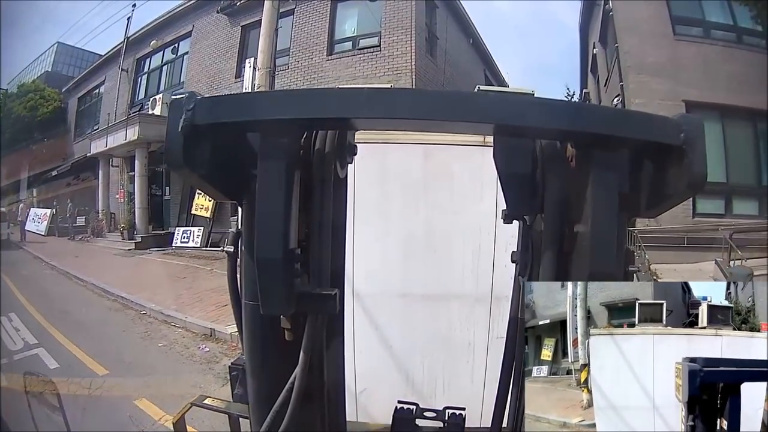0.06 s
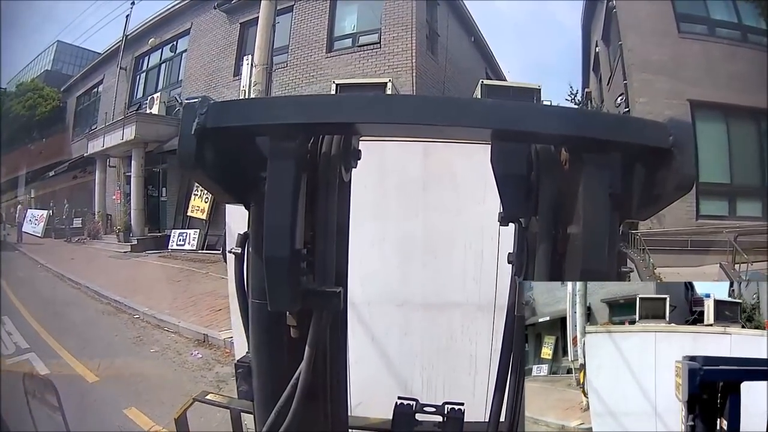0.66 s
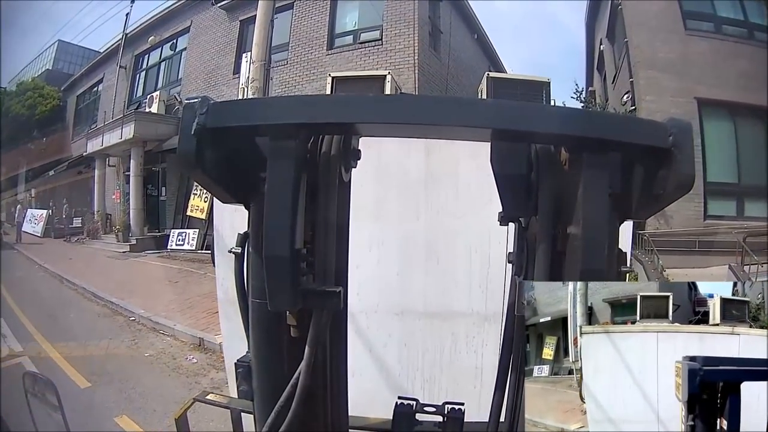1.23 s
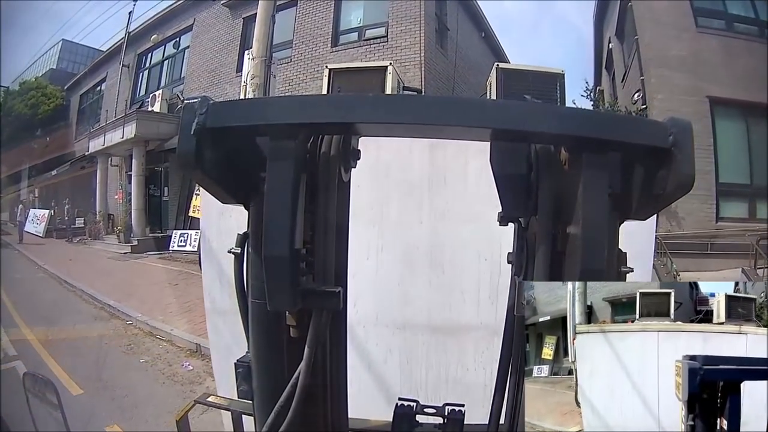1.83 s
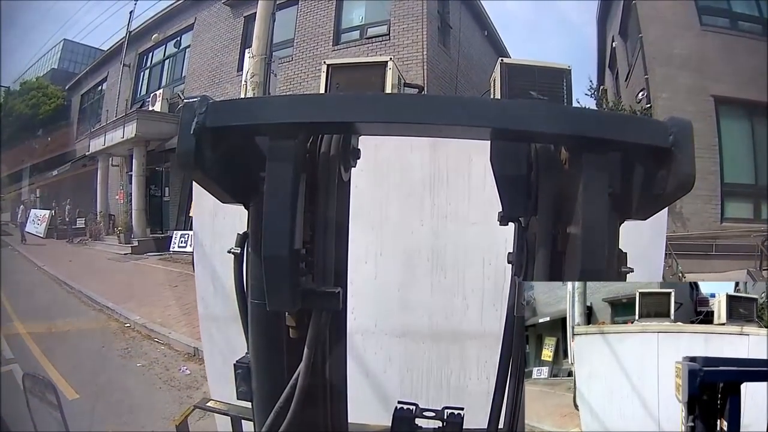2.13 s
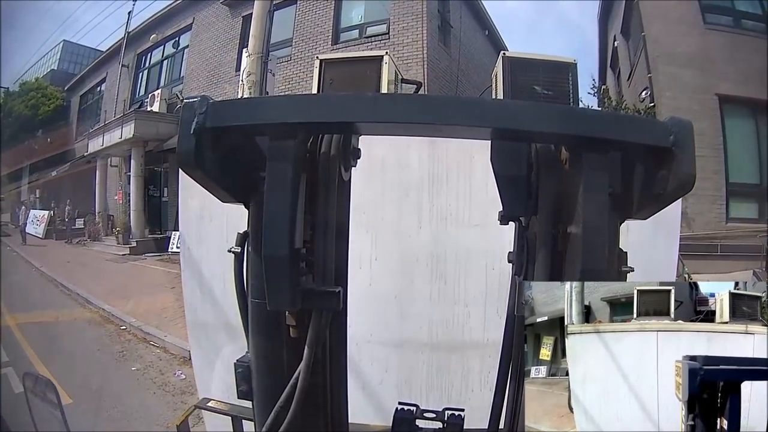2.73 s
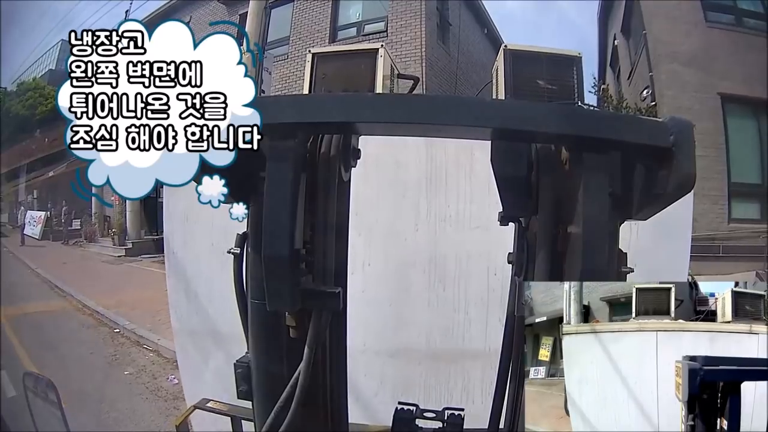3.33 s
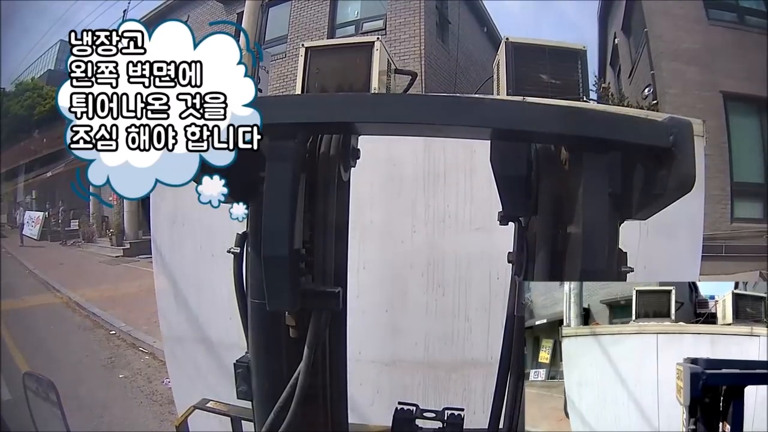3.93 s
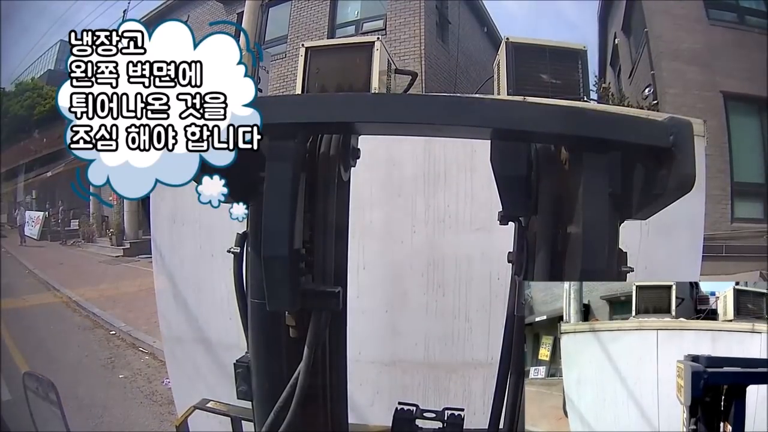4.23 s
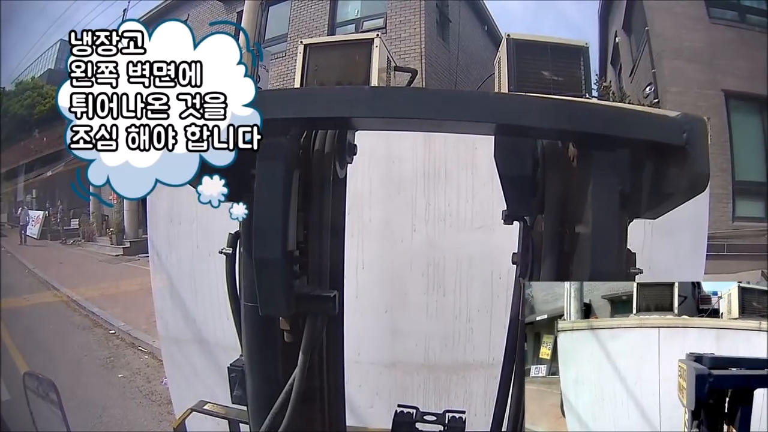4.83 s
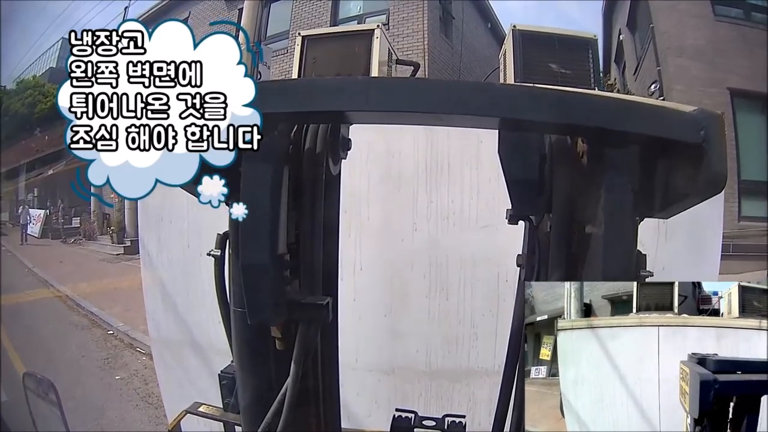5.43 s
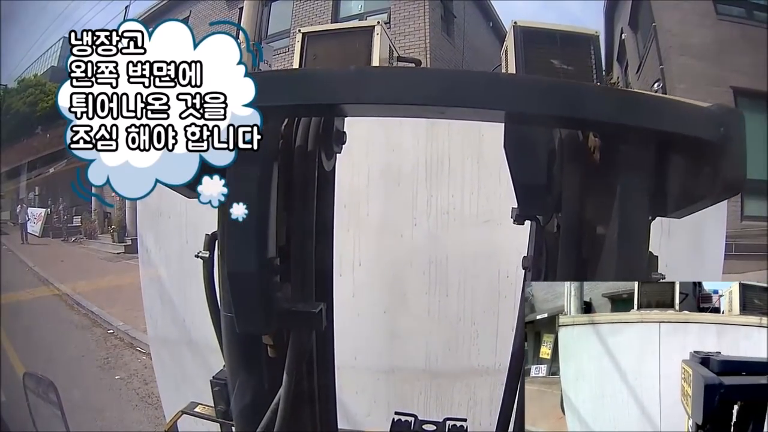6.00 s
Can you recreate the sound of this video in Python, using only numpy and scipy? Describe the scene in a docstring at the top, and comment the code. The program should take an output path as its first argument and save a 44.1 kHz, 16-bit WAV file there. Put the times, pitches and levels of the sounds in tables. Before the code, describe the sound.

A forklift drives slowly along a street, heard from the driver's seat through a small, dull microphone. Its engine surges twice with a strong hum and a gear whine, the first time amid thumping bumps and steel rattles. It settles over a low road rumble, with faint metallic whistles. Past halfway the bumps return: the mast rattles and squeaks once, the forks clang, and a sharp click leads into the last jolts.

```python
"""A forklift carries a load slowly along a street, heard from the driver's seat on a small, dull mic.
Its four-cylinder engine surges twice under a strong hum and a gear whine, the first time amid bumps
that thump the chassis and rattle the mast. It settles to a nearly even speed over the road's rumble,
and faint metallic whistles drift in. Past halfway the bumps return: the mast rattles and squeaks once,
the forks clang, and the sharpest of a few thin clicks leads into a last run of jolts."""
import sys
import numpy as np
from scipy import signal
from scipy.fft import rfft, irfft, next_fast_len
from scipy.io import wavfile
from scipy.ndimage import uniform_filter1d, map_coordinates

SR = 44100
rng = np.random.default_rng(int(sys.argv[2]) if len(sys.argv) > 2 else 0)


def wav_out(sig):
    """Save sig, one row per channel (or a flat mono array), as 16-bit PCM at SR to the path in sys.argv[1]."""
    wavfile.write(sys.argv[1], SR, np.round(np.clip(np.atleast_2d(sig).T, -1, 1) * 32767).astype(np.int16))


N = 267422

# bumps through the chassis: (time [s], level [dB], brightness [dB/octave])
ROAD_BUMPS = [(0.247, -8, 3), (.28, -9.5, 4), (.308, -5.5, 4), (.367, -6.5, 3), (.398, -7.5, 2.5),
              (0.44, -7.5, 3), (.517, -7.5, 5.5), (.678, -11.5, 4), (.762, -5.5, 2.5), (0.785, -5.5, 3),
              (2.282, -16, -18), (3.561, -11, -2), (3.993, -9, 1.5), (4.387, -12.5, 13), (5.274, -6, -5.5),
              (5.47, -11.5, 2.5), (5.489, -4, -0.5), (5.677, -8, 1)]
# tone colour of loose steel: (frequency [Hz], level [dB])
STEEL_SPECTRUM = [(60, -70.5), (250, -8.5), (420, -0.5), (700, 1.5), (1200, 0), (1500, -1.5), (1900, -1.5),
                  (2700, -6.5), (3700, -5.5), (4600, -10.5), (6000, -73)]
# ringing panels: (frequency [Hz], width [Hz], boost [dB])
PANEL_MODES = [(1243, 36, 3.5), (1337, 80, 5), (1630, 47, 2), (1826, 21, 6), (1997, 130, 4), (2220, 56, 2),
               (2620, 56, 1.5), (2866, 26, 7), (3160, 240, -0.5)]


def hum(speed, shaft, load_db):
    """The engine's hum grows with load and peaks where its pitch meets the cab's resonance."""
    # the hum dips briefly: (time [s], depth [dB], half width [s])
    dips = [(.02, 9.5, 0.061), (0.62, 11.5, 0.12), (1.05, 4.5, .12), (2.68, 9.5, 0.096), (3.9, 11, 0.026),
            (4.14, 14.5, 0.024), (4.6, 16, 0.036), (5.47, 10, 0.088), (5.809, 15.5, 0.06)]
    order = 5  # cycles per shaft turn
    t = np.arange(N) / SR
    dip_db = sum(db * np.exp(-((t - s) / width) ** 2) for s, db, width in dips)
    cab = resonance(order * speed, centre=160.2, width=15.3)
    waver_db = 1.1 * wobble(9) + 0.84 * wobble(30)
    level_db = -13.4 + 0.75 * load_db - dip_db + waver_db
    return amp(level_db) * cab * tone(order * shaft + 0.0051 * wobble(27))


def engine(shaft, load_db):
    """Low shaft tones, with block noise and panel clatter pulsed by the firings; all grow with load."""
    # engine tones: (order [x shaft rate], relative level [dB])
    orders = [(1, -21), (2, -6), (3, -11), (4, -15), (4.5, -11), (5.5, -12), (6, -7), (7, -9.5),
              (7.5, -11.5), (8, -9.5), (10, -9.5), (10.5, -13), (11, -9.5), (12, -10), (12.5, -14.5),
              (14, -15.5), (15, -9.5), (16, -16.5)]
    # dark noise of the block: (frequency [Hz], level [dB])
    block_spectrum = [(80, -26), (170, 1), (240, 5), (295, -1), (345, 0), (430, -3.5), (520, -4),
                      (620, -8.5), (800, -19.5), (1400, -41)]
    # brighter clatter: (frequency [Hz], level [dB])
    clatter_spectrum = [(300, -24), (700, 0.5), (1000, -0.5), (1250, -4.5), (1500, -7), (1950, -8),
                        (2500, -11.5), (3050, -14), (3600, -15), (4500, -23)]
    drone = amp(-27 + load_db) * shaft_tones(orders, shaft, flutter_db=2.5, drift=0.07, rate=9)
    block = amp(-24.5 + load_db) * patchy(noise(block_spectrum), depth_db=-0.5)
    block *= firings(shaft, scatter_db=2, sharpness=0.18)
    clatter = patchy(noise(clatter_spectrum, peaks=PANEL_MODES), depth_db=2.5)
    clatter *= firings(shaft, scatter_db=0.5, sharpness=0.097)
    return drone + block + amp(-28.5 + 0.94 * load_db) * clatter


def chassis():
    """The wheels rumble, and each bump rings the frame's low modes in a fresh balance."""
    # roughness of the road: (time [s], relative level [dB])
    roughness = [(0.0, -20.5), (0.15, -21.5), (0.4, -20), (.6, -25), (1.2, -29.5), (2.0, -28), (2.36, -27),
                 (2.6, -31.5), (3.3, -29.5), (3.6, -22.5), (3.95, -28), (4.94, -26.5), (5.18, -23.5),
                 (5.3, -18.5), (5.52, -22.5), (6.06, -25.5)]
    # wheel rumble: (frequency [Hz], level [dB])
    rumble_spectrum = [(8, -54), (22, -33), (38, -22), (56, -3.5), (80, -1.5), (108, -6.5), (130, -1),
                       (175, -1), (215, -12), (320, -26), (800, -65)]
    # modes of the frame on its tyres: (frequency [Hz], level [dB], decay time [x base_t60_s])
    frame_modes = [(53, -14.5, 1.9), (64.7, -11, 0.52), (99, -4.5, 0.37), (124.7, 0, 1.3), (145.1, -3, 1.6),
                   (193.7, -4.5, 0.76), (259, -17.5, 0.48), (363, -16.5, 0.53), (446.3, -18, 0.41)]
    base_t60_s = 0.18
    road_db, = curves(roughness)
    rumble = amp(road_db + 2.5) * noise(rumble_spectrum)
    t = np.arange(SR // 2) / SR
    soft_tyre = 1 - np.exp(-t / 0.0028)
    thumps = np.zeros(N + len(t))
    hz, mode_db, decay = np.transpose(frame_modes)[:, :, None]
    for s, db, tilt in ROAD_BUMPS:
        strength = amp(mode_db + tilt * np.log2(hz) + 2 * rng.standard_normal(hz.shape))
        pitch = hz * (1 + 0.015 * rng.standard_normal(hz.shape))
        ring = strength * tone(pitch * t) * np.exp(-np.log(1000) * t / (base_t60_s * decay))
        thump = soft_tyre * ring.sum(axis=0) / np.linalg.norm(strength)
        thumps[round(s * SR):][:len(t)] += amp(db) * thump
    return rumble + thumps[:N]


def boom(speed, shaft):
    """An engine order swells whenever the speed brings it onto a resonance of the frame."""
    # frame resonances: (order [x shaft rate], frequency [Hz], width [Hz], level in tune [dB])
    resonances = [(3, 90, 5, -25), (4, 132, 4, -31), (5.5, 165, 7, -25), (6, 184, 8, -20.5),
                  (10, 340, 8, -31.5), (15, 516, 11, -39), (16, 478, 12, -34.5), (18, 526, 11, -30),
                  (20, 692, 14, -32)]
    return sum(amp(db + 2 * wobble(22)) * resonance(order * speed, hz, width)
               * tone(order * shaft + 0.06 * wobble(14)) for order, hz, width, db in resonances)


def gears(shaft):
    """Meshing teeth whine: a tone with sidebands, heard through the housing's resonance."""
    # swell of the whine: (time [s], gain [dB])
    swell = [(0, -31), (.24, -27.5), (.34, -34), (.62, -32), (.72, -31.5), (.98, -31), (1.1, -35),
             (2.45, -33), (2.53, -28), (2.92, -26.5), (3.05, -29), (3.85, -29), (3.93, -24.5), (4.55, -26),
             (4.7, -24), (5.25, -24), (5.3, -29.5), (5.85, -32.5), (6.06, -27)]
    # mesh tone and sidebands: (order [x shaft rate], relative level [dB])
    mesh_orders = [(18.5, -9.5), (19, -12), (19.5, -4), (20, -10), (20.5, -5.5), (21, -10)]
    whine_db, = curves(swell)
    mesh = shaft_tones(mesh_orders, shaft, flutter_db=2, drift=0.11, rate=13)
    return filtered(amp(whine_db) * mesh, lambda hz: resonance(hz, centre=590.6, width=70))


def mast_rattle():
    """Loose steel knocks in short bursts that ring the mast's channels."""
    # loud rattles: (time [s], level [dB], t60 [s], brightness [dB/octave])
    hits = [(.04, -25.5, 0.028, -4.5), (0.141, -28, 0.46, -1), (.176, -22.5, 0.41, -2),
            (.245, -21, 0.12, -5), (0.339, -24.5, .08, -2), (.357, -21.5, 0.082, -4),
            (.47, -23, 0.15, -5.5), (0.75, -25.5, 0.14, -1), (.775, -22, 0.089, -8),
            (3.421, -22, 0.018, -7), (3.646, -25, 0.22, 0.5), (3.715, -23, .12, -1.5),
            (3.765, -22.5, .14, -5), (3.958, -20.5, 0.12, -5), (3.977, -16, 0.233, -7.5),
            (4.24, -20, 0.11, 8), (4.263, -16, 0.097, 4), (4.281, -13, 0.08, -10), (4.328, -20, .17, -0.5),
            (4.363, -19.5, .09, 7), (4.384, -15.5, 0.065, -0.5), (5.219, -20, 0.22, -10),
            (5.466, -22.5, .1, -5.5), (5.635, -17, 0.083, -3.5), (5.648, -17.5, 0.094, -5.5),
            (5.658, -15, 0.067, -12)]
    # ring of the channels: (frequency [Hz], width [Hz], boost [dB])
    modes = [(460, 23, 5.5), (645, 21, 5.5), (940, 33, 7.5), (1390, 84, 5.5), (1750, 50, 4.5),
             (1980, 87, 6), (2580, 76, 3)]
    return sum(amp(db) * blow(s, t60, attack=0.00013) * noise(STEEL_SPECTRUM, tilt, modes)
               for s, db, t60, tilt in hits)


def mast_squeak():
    """Dry steel slips three times: a falling squeak with a rasp under it."""
    # path of the squeak: (time [s], pitch [Hz], level [dB])
    path = [(4.221, 2190, -45), (4.226, 2260, -14), (4.231, 2300, -10.5), (4.238, 2230, -13.5),
            (4.242, 2120, -25), (4.246, 2010, -16), (4.249, 1900, -25), (4.252, 1830, -18),
            (4.259, 1790, -38)]
    # rasp of slipping steel: (frequency [Hz], level [dB])
    rasp_spectrum = [(2400, -29), (3200, -0.5), (3800, 0), (4600, -14.5)]
    hz, db = curves(path)
    t = np.arange(N) / SR
    slipping = (t > path[0][0]) & (t < path[-1][0])
    squeak = amp(db + 0.97 * wobble(299.4)) * tone(np.cumsum(hz) / SR + 0.03 * wobble(460))
    rasp = amp(db - 14) * noise(rasp_spectrum)
    return slipping * (squeak + rasp)


def forks():
    """A jolted fork rings briefly on one note."""
    # dull clangs: (time [s], pitch [Hz], level [dB], t60 [s])
    clangs = [(.786, 460, -19.5, 0.21), (4.365, 421, -17, 0.27), (5.492, 289, -21.5, .16),
              (5.643, 961, -23, .13)]
    t = np.arange(N) / SR
    return sum(amp(db) * blow(s, t60, attack=0.004) * tone(hz * t + 0.04 * wobble(64))
               for s, hz, db, t60 in clangs)


def chatter(load_db):
    """Loose steel is shaken by every bump, and ticks at random, harder as the engine works."""
    ticks_per_s = 5
    draws = rng.random((round(ticks_per_s * N / SR), 2))
    ticks = sum(amp(-34 + 2 * size) * blow(when * N / SR, t60=0.1, attack=0.0005) for when, size in draws)
    ticks *= amp(load_db) * noise(STEEL_SPECTRUM, tilt=-1.1, peaks=PANEL_MODES)
    shakes = sum(amp(db - 20) * blow(s, t60=0.13, attack=0.0035) for s, db, _ in ROAD_BUMPS)
    return ticks + shakes * noise(STEEL_SPECTRUM, tilt=-9.5, peaks=PANEL_MODES)


def mast_whistles():
    """Faint, wavering metallic notes fade in and out."""
    # whistles: (start [s], end [s], pitch [Hz], level [dB])
    notes = [(2.509, 2.553, 3010, -29), (3.088, 3.658, 2810, -43), (3.555, 3.88, 1342, -38.5)]
    t = np.arange(N) / SR
    whistles = np.zeros(N)
    for start, end, hz, db in notes:
        fade = np.clip(np.minimum(t - start, end - t) / 0.033, 0, 1)
        whistles += fade * amp(db + 1.3 * wobble(24.96)) * tone(hz * t + 0.096 * wobble(62))
    return whistles


def clicks():
    """Tiny sharp clicks, each trailed by a faint crackle."""
    # thin clicks: (time [s], peak level [dB])
    snaps = [(.243, -42), (.256, -30), (.2985, -21.5), (.3625, -21), (.768, -21), (4.2452, -26),
             (5.055, -42), (5.2689, -11.5), (5.483, -47)]
    crackle_count, crackle_s, crackle_db = 4, 0.016, -30
    spikes = np.zeros(N)
    for s, db in snaps:
        delay, size = rng.random((2, crackle_count))
        spikes[((s + crackle_s * delay) * SR).astype(int)] = amp(db + crackle_db) * size
        spikes[round(s * SR)] = amp(db)
    return signal.lfilter([1], [1, -np.exp(-1 / (SR * 0.00004))], spikes)


def intake(shaft, load_db):
    """Air is drawn in at each stroke; its rush stands out only when the engine works hard."""
    # rush of air: (frequency [Hz], level [dB])
    spectrum = [(1200, -29.5), (2300, 0), (3700, -2), (4600, -11)]
    return amp(-44.5 + 1.8 * load_db) * noise(spectrum) * firings(shaft, scatter_db=0.5, sharpness=0.45)


def firings(shaft, scatter_db, sharpness):
    """Pressure envelope of two firings a turn, each of its own strength."""
    stroke = (2 * shaft).astype(int)
    strength = amp(scatter_db * rng.standard_normal(stroke[-1] + 1))
    return unit(strength[stroke] * np.exp(-sharpness * (2 * shaft % 1)))


def shaft_tones(orders, shaft, flutter_db, drift, rate):
    """Partials locked to the shaft, each unsteady in level and phase."""
    return sum(amp(db + flutter_db * wobble(rate))
               * tone(order * shaft + rng.random() + drift * wobble(rate)) for order, db in orders)


def patchy(x, depth_db):
    """Narrow bands swell and fade on their own, as loose panels start and stop ringing."""
    bands = signal.stft(x, nperseg=1024)[2]
    swell = uniform_filter1d(rng.standard_normal(bands.shape), size=2, axis=0)
    swell = uniform_filter1d(swell, size=16, axis=1)
    return unit(signal.istft(bands * amp(depth_db * unit(swell)), nperseg=1024)[1][:N])


def noise(spectrum, tilt=0, peaks=()):
    """Noise of rms 1 with the given spectrum, tilted in dB per octave and boosted at each peak."""
    def response(hz):
        boost_db = sum(db / (1 + (2 * (hz - centre) / width) ** 2) for centre, width, db in peaks)
        return amp(along(spectrum, hz) + tilt * np.log2(hz + 1) + boost_db)
    return unit(filtered(rng.standard_normal(N), response))


def blow(s, t60, attack):
    """Envelope of a contact at time s."""
    t = np.maximum(np.arange(N) / SR - s, 0)
    return (1 - np.exp(-t / attack)) * np.exp(-np.log(1000) * t / t60)


def tone(cycles):
    """A sine of rms 1 from its count of cycles."""
    return np.sqrt(2) * np.sin(2 * np.pi * cycles)


def resonance(hz, centre, width):
    """Gain of a resonance, 1 at its centre."""
    return 1 / np.hypot(1, 2 * (hz - centre) / width)


def filtered(x, response):
    """Equalise x with a gain that depends on frequency."""
    size = next_fast_len(N + SR // 2)
    return irfft(rfft(x, size) * response(np.fft.rfftfreq(size, 1 / SR)), size)[:N]


def wobble(rate):
    """A smooth random curve, rate knots a second."""
    return map_coordinates(rng.standard_normal(int(N * rate / SR) + 4), [np.arange(N) * rate / SR])


def curves(rows):
    """An automation curve for each column after the time."""
    s, *columns = np.transpose(rows)
    return [np.interp(np.arange(N) / SR, s, column) for column in columns]


def along(points, hz):
    """Read an EQ curve on a log frequency axis."""
    knots_hz, db = np.transpose(points)
    return np.interp(np.log(hz + 1), np.log(knots_hz), db)


def amp(db):
    """Decibels to gain."""
    return 10 ** (np.asarray(db) / 20)


def unit(x):
    """Scale to rms 1."""
    return x / np.sqrt(np.mean(x ** 2) + 1e-20)


def scene():
    """Shaft speed and load drive the engine and gears while the road shakes the chassis and steel."""
    # engine speed: (time [s], shaft rate [turns/s])
    revs = [(0, 29), (.1, 28.9), (.2, 29.3), (.3, 33.3), (.42, 33.8), (.55, 33), (.65, 31), (.77, 29.2),
            (.97, 29.6), (1.06, 33.9), (1.15, 34.8), (1.3, 33.7), (1.5, 32.6), (1.72, 32.9), (1.88, 33.6),
            (2.0, 32.9), (2.12, 33), (2.35, 32.1), (2.62, 30), (2.78, 29.8), (2.95, 31.4), (3.18, 32.1),
            (3.48, 31.7), (3.7, 33.3), (3.82, 33.2), (4.0, 31.2), (4.16, 29.7), (4.28, 29.9), (4.46, 30.7),
            (4.66, 29.6), (4.82, 30), (5.02, 31), (5.25, 31.4), (5.45, 32.6), (5.66, 32.7), (5.8, 31),
            (6.06, 31.5)]
    # engine load, as its mechanical noise: (time [s], level [dB])
    effort = [(0.0, -29.5), (0.69, -31.5), (1.1, -31), (1.4, -32), (1.7, -31), (1.87, -29), (2.15, -28.5),
              (2.55, -31), (2.85, -29), (3.0, -29), (3.5, -28), (3.62, -26), (3.8, -25), (3.9, -27),
              (4.15, -28), (4.4, -26), (4.6, -28), (4.75, -26), (5.03, -26), (5.25, -26.5), (5.29, -30),
              (5.67, -31), (6.06, -30)]
    cruise_db = -29
    speed, = curves(revs)
    load_db = curves(effort)[0] - cruise_db
    shaft = np.cumsum(speed) / SR  # turns since the start
    drive = hum(speed, shaft, load_db) + engine(shaft, load_db) + gears(shaft) + intake(shaft, load_db)
    frame = boom(speed, shaft) + chassis()
    steel = mast_rattle() + mast_squeak() + mast_whistles() + forks() + chatter(load_db)
    return (drive + frame + steel)[None]


def record(dry):
    """A dull microphone rounds off the peaks; clicks and a faint hiss reach above its band."""
    # treble roll-off and hiss colour: (frequency [Hz], level [dB])
    roll_off = [(3600, 0), (4000, -7), (4300, -16), (4600, -29), (5000, -44), (5600, -70)]
    hiss_spectrum = [(4500, -7.5), (8000, -3.5), (12000, -14), (16000, -16)]
    top_hz = 15870
    rounded = dry[0] / (1 + np.abs(dry[0]) ** 8) ** (1 / 8)
    dull = filtered(rounded, lambda hz: amp(along(roll_off, hz)))
    hiss = amp(-81) * noise(hiss_spectrum)
    return filtered(dull + clicks() + hiss, lambda hz: hz < top_hz)[None]


dry = scene()
out = record(dry)
wav_out(out)
```